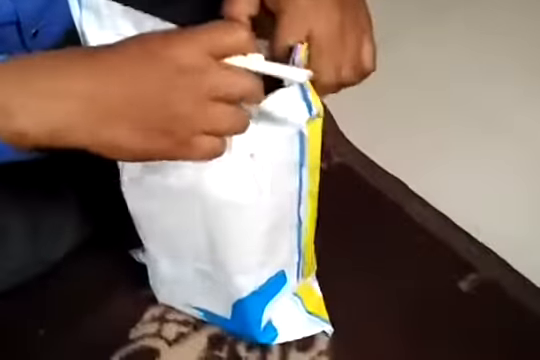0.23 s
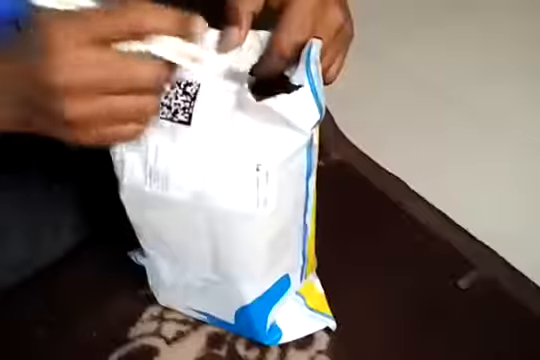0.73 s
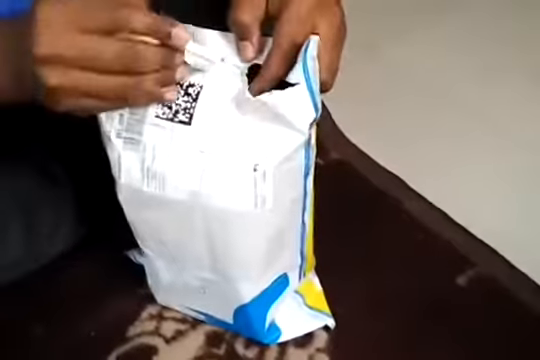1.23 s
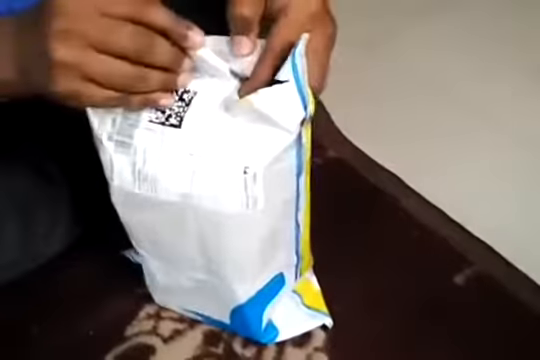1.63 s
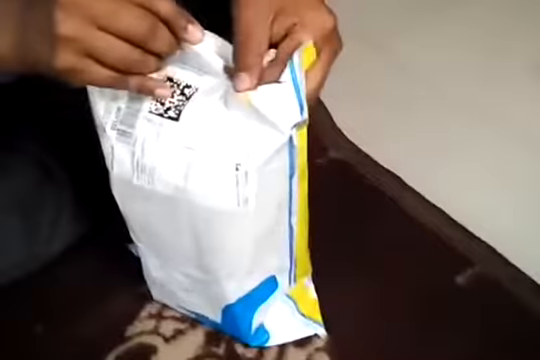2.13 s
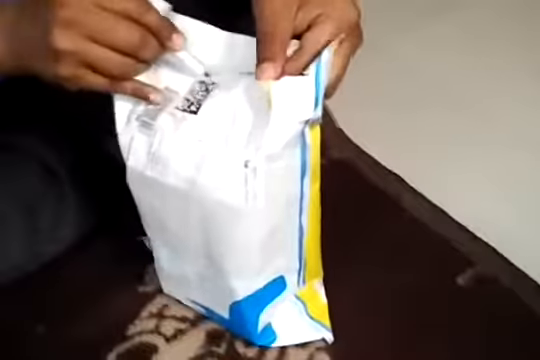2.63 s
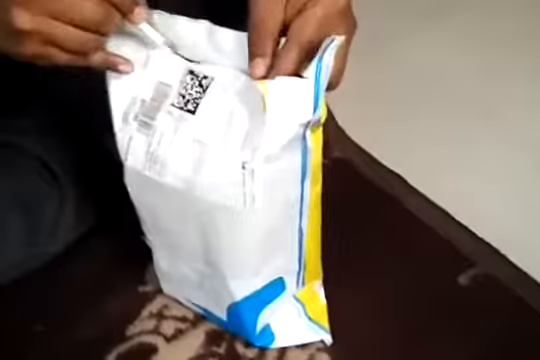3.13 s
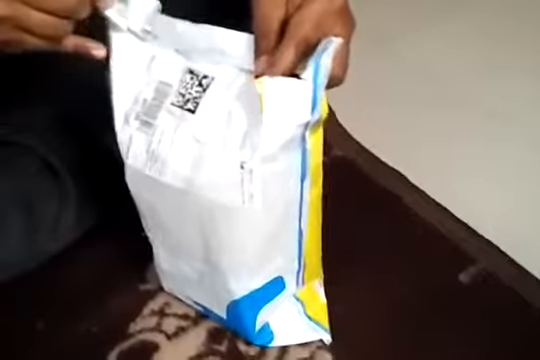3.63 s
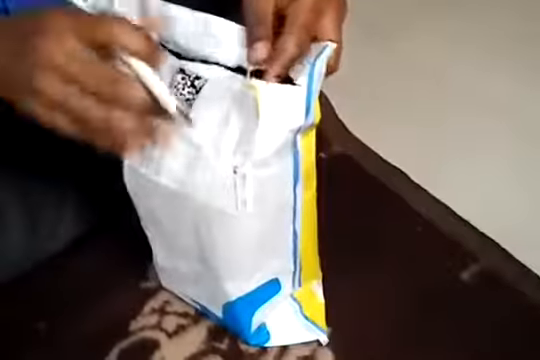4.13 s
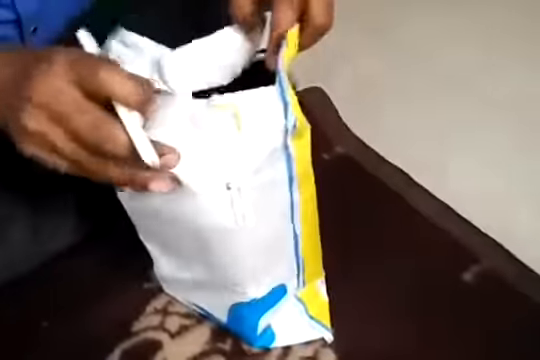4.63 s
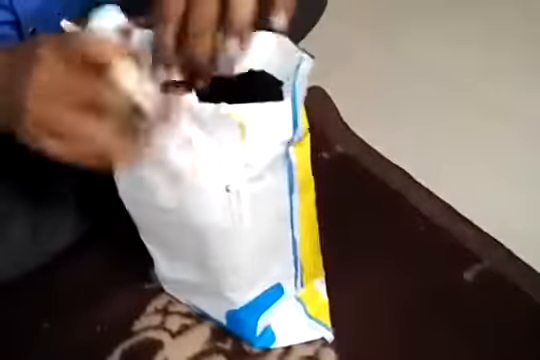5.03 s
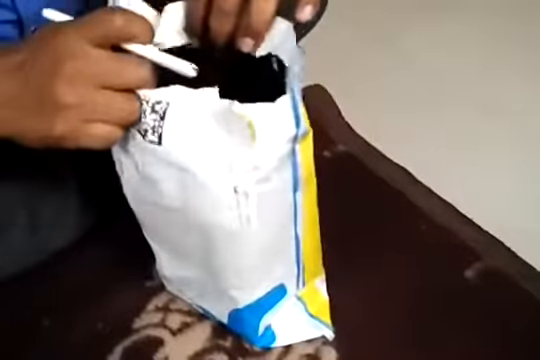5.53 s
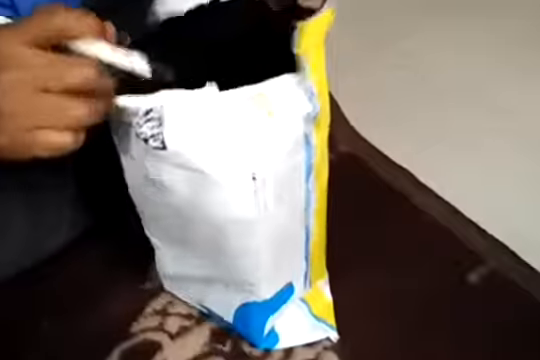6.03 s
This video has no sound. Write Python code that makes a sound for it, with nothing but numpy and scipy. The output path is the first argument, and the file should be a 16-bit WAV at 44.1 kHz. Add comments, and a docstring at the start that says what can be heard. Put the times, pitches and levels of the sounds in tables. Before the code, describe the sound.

Close handling of a stiff plastic mailer bag in a small bare room, picked up by a phone. Busy crinkling opens it, then thins to scattered ticks after a second. One very loud, bright snap cracks at about two and a half seconds, followed by a quieter stretch, then crowded tearing snaps and pops until the end. Faint room hush and low bumps lie beneath.

```python
"""Two hands tear open and crumple a stiff plastic mailer bag in a small bare room, close to a phone.
From the start a faint hush and low rumble lie under crackling film, made of random tiny cracks coloured by the bag.
Creases snap in short bursts of cracks, panels pop as short fading tones, and walls add a tail of fading noise.
The sounds thin out after the first second, the loudest snap comes at about 2.5 s, then a quieter stretch.
From about 3.7 s the snaps and pops crowd together until just after 6 s."""
import sys
import numpy as np
from scipy import signal
from scipy.fft import rfft, irfft
from scipy.io import wavfile
from scipy.ndimage import uniform_filter1d

SR = 44100
rng = np.random.default_rng(int(sys.argv[2]) if len(sys.argv) > 2 else 0)


def master(y):
    """Save y as 16-bit WAV."""
    cut = np.clip(np.atleast_2d(y).T, -1, 1)
    pcm = np.round(cut * 32767)  # scale
    wavfile.write(sys.argv[1], SR, pcm.astype(np.int16))


def level_to_linear(level):
    """Convert decibel levels to linear amplitude factors, elementwise."""
    exponent = np.asarray(level, float) / 20
    return 10 ** exponent


N = 276507
GRID_HZ = np.linspace(0, SR / 2, 2049)  # pitches at which filters are drawn
STEP = 32  # samples between readings of a gesture
# All source levels are those ahead of the phone's rounding and gain.

# Room hush, shape only: pitch_hz, level_db (per Hz)
HUSH_COLOUR = [(26, -45), (45, -21), (165, -9.5), (205, -10), (294, -2), (525, -5.5), (870, -23),
               (1000, -8), (6110, -18.5), (14200, -18.5)]
HUSH_DB, RUMBLE_DB = -65, -84  # rms of the hush, and of the rumble between bumps
# Low bumps under the handling: start_s (fullest moment), level_db (added rumble)
LOW_BUMPS = [(.16, -64), (1.35, -82), (2.58, -68.5), (3.79, -63.5), (4.4, -81), (4.64, -68.5), (5.34, -75),
             (5.75, -73.5), (6.06, -70)]
BUMP_SWELL_DB_PER_S, BUMP_FADE_DB_PER_S = 116, 69

# Broad colour of the film at the phone, shape only: pitch_hz, level_db
FILM_COLOUR = [(59, -68), (100, -25), (300, -5), (340, -3.5), (548, -17), (1060, 7.5), (1200, 1),
               (1390, 2.5), (1750, -7), (2020, -8), (4180, -1.5), (6070, -2.5), (14200, -8)]
# Resonances of the bag and the phone's port, before a spot shifts them: pitch_hz, width_hz, boost_db
BAG_RESONANCES = [(380, 89, -2), (422, 43, 9.5), (634, 84, 5.5), (900, 190, 0), (1288, 14.3, -11.5),
                  (2037, 250, 6.5), (2553, 1900, 21.5), (6200, 250, 4.5), (8320, 5100, 8.5)]
# Borders between the voices thud, wide panels, small panels, crack: pitch_hz
VOICE_BORDERS_HZ = [700, 1700, 4000]
# Places on the bag that crack: stretch (factor on resonance pitch), left_lag_ms
BAG_SPOTS = [(.97, -.14), (1.0, .07), (1.03, -.11), (.99, -.16)]
# How the left port differs from the right: pitch_hz, left_over_right_db
LEFT_OVER_RIGHT = [(60, .5), (200, 2), (400, 1), (1300, 2.5), (2400, 3.5), (4200, 4), (5500, 9.5),
                   (8000, 10), (12000, 8), (15000, 6)]

# Crumplings of the film: start_s (full strength), held_s, level_db (before voice levels), tilt_db (crack to thud)
CRUMPLINGS = [(0.0, 0.081, -45.5, 0.5), (.15, 0.06, -45, 2), (0.278, 0.079, -39, 0.5),
              (.42, 0.097, -52.5, -5), (.52, 0.019, -51, 24), (0.678, 0.0074, -41.5, -3),
              (1.029, 0.023, -47.5, 2), (1.111, 0.013, -51.5, -4), (1.588, 0.011, -47, -3),
              (1.66, 0.06, -59, 6), (1.825, 0.06, -55.5, 7), (1.908, 0.06, -52, -7.5),
              (2.149, 0.0084, -50, 1), (2.238, 0.0067, -48, 6), (2.38, .01, -91, 20),
              (2.483, 0.0023, -73, -18), (2.548, 0.05, -28, 7), (2.95, 0.034, -59.5, 9),
              (3.038, 0.092, -47.5, -7), (3.139, 0.068, -43, -4.5), (3.469, 0.01, -51.5, 13),
              (3.673, 0.0036, -33, 11), (3.72, 0.013, -43, 7), (3.874, 0.084, -53.5, -5.5),
              (4.1, 0.12, -77, -25), (4.328, 0.0062, -51, 15), (4.39, 0.069, -55, 0),
              (4.46, 0.0076, -40, 0), (4.55, 0.01, -40.5, -6), (4.615, 0.013, -37, -3),
              (4.678, 0.01, -36.5, 1), (4.82, 0.09, -60, 2), (5.073, 0.005, -40, 10),
              (5.16, 0.093, -54.5, 14), (5.312, .03, -40.5, -1), (5.39, 0.081, -45, 8),
              (5.474, 0.014, -38, 1.5), (5.53, .06, -45, 2), (5.623, 0.0033, -34.5, 1),
              (5.66, 0.031, -40.5, 6), (5.79, 0.18, -50.5, 3), (5.938, 0.0027, -39, -12),
              (5.97, 0.039, -37, 5), (6.018, 0.0035, -33.5, 1), (6.06, 0.048, -46, 36),
              (6.15, .04, -51.5, 2)]
SWELL_DB_PER_S, SETTLE_DB_PER_S = 2195, 180
# Crumpling level of thud, wide panels, small panels, crack: level_db
VOICE_LEVEL_DB = [-14, -5.5, -2.5, -6]
# Share of the tilt taken by each of the four voices: share (no unit)
TILT_SHARE = [0.23, -0.26, -0.29, -0.87]
# Faint crackle of the resting film in each of the four voices: level_db
RESTING_LEVEL_DB = [-74, -84, -81.5, -82.5]

# Bands of the walls' answer: pitch_hz, t60_s (time to fall 60 dB), level_db (before the band filter)
WALL_TAIL = [(151, 0.82, -3.5), (360, 0.16, -2.5), (920, 0.5, -6.5), (2720, 0.35, -1), (5900, 0.39, -1.5),
             (10700, 0.3, -8), (14000, 0.26, -3)]
TAIL_START_MS, TAIL_ALIKE_HZ = 4, 1100  # silent until the start; both ports nearly alike well below this pitch

# Panels that pop with a clear pitch: start_s, level_db (before rise and fade), pitch_hz
CLEAR_POPS = [(0.1231, -36, 338), (0.143, -33, 372), (0.1568, -32, 320), (0.6662, -21.5, 960),
              (1.822, -21, 2710), (2.4760, -25, 6200), (2.5440, -7, 6200), (2.543, -21, 1113),
              (2.5520, -37.5, 345), (3.3440, -42, 864), (3.4520, -29, 2050), (3.6660, -24, 400),
              (3.6780, -27.5, 408), (3.7460, -31, 1030), (4.0810, -30, 6000), (4.5700, -20.5, 1980),
              (4.6220, -33, 393), (4.677, -15, 3150), (5.5400, -21.5, 2050), (6.0160, -25.5, 400)]
POP_T60_MS, POP_RISE_MS = 14.9, 0.98  # the ring time is for 1 kHz
SMALL_POPS_PER_S, SMALL_POP_TOP_DB = 160, 6  # top level is over the crumpling at that moment
SMALL_POP_HZ = (303.5, 6750)

# Loud snaps, before the voices: start_s, crack_peak_db, ring_db (over the crack, for a perfect size match),
# size (0 small panel to 1 whole bag), length_ms
CREASE_SNAPS = [(0.0647, -20, -15, 0.52, 4), (0.1232, -30.5, 3, 0.61, 34), (0.1413, -25.5, -0.5, .5, 12),
                (0.183, -15, -7, 0.055, 4.8), (0.2575, -26, 7.5, 0.63, 7.6), (0.27, -19, -17, .5, 4),
                (0.2882, -18, -19, 1, 2), (0.3464, -27, -17, 0.14, 15), (0.4844, -34, -1.5, 0.55, 14),
                (0.5246, -44.5, 17.5, 0.37, 4.7), (0.6659, -20, 6.5, 0.71, 5.9),
                (0.693, -18, -13, 0.33, 5.6), (1.0006, -46.5, 12.5, 0.81, 19), (1.0202, -46, 17, 0.26, 9.2),
                (1.0424, -50.5, 20.5, .5, 13), (1.105, -23, -1, .5, 3.6), (1.285, -52, 8.5, 0.56, 7.8),
                (1.5266, -39.5, -7, 0.51, 21), (1.5800, -30, 1.5, 0.4, 6.8), (1.5898, -26, -14, .5, 4.5),
                (1.651, -34, 1.5, 0.49, 12), (1.731, -37, -1.5, .02, 8.9), (1.7890, -32.5, -12, 0.12, 14),
                (1.8194, -26.5, 3, 0.042, 5.4), (1.8794, -36, 2.5, .5, 4.3), (1.9027, -18, -4.5, 0.7, 4.7),
                (2.043, -42.5, 8, .5, 15), (2.1307, -49.5, 23.5, 0.17, 4.4), (2.1386, -32.5, -4.5, 1, 7.5),
                (2.2, -40.5, -1, 0.51, 12), (2.2302, -32, -1, .5, 9), (2.3704, -63.5, 22, 1, 2),
                (2.4054, -53, -20, .5, 6.9), (2.4713, -28, -26, 0.5, 2.4), (2.4762, -24.5, -11, .5, 6.2),
                (2.5300, -24, -5, .52, 19), (2.541, -6.5, -1.5, 0.49, 9.6), (2.5430, -12.5, -1, .5, 28),
                (2.5778, -23, 1, .02, 12), (2.593, -14, -21, .02, 14), (2.6167, -28.5, 10, 0.59, 3.2),
                (2.8707, -40, 3.5, .5, 4.7), (2.9308, -35, -5.5, 0.69, 8.9), (3.02, -27.5, -2, 0.56, 8.3),
                (3.2357, -27.5, -4, 0.14, 2.5), (3.3414, -57, 4, 0.29, 5.8), (3.4504, -37.5, 12, 0.16, 4.6),
                (3.4565, -25.5, -5, 0.49, 5), (3.4659, -43, 0, 0.46, 1.4), (3.6659, -16, 7, 0.71, 20),
                (3.6737, -15.5, 0, 0.076, 7.2), (3.717, -26.5, -2, .47, 6.1),
                (3.755, -39.5, 22.5, .28, 4.7), (3.839, -43, 18.5, 0.19, 24),
                (3.865, -31.5, 5.5, 0.72, 5.5), (3.883, -33, -18, .28, 8.1), (3.92, -35, -24, 0.47, 12),
                (3.9431, -34, 4.5, 0.36, 9.6), (4.0344, -43, 1.5, .5, 7.6), (4.0573, -43.5, 8, .5, 5.5),
                (4.08, -26.5, -17, .5, 6.7), (4.195, -46, -6, 0.57, 9.6), (4.2045, -40, -3, 0.87, 17),
                (4.288, -37.5, -10, 0.47, 8.2), (4.3224, -44.5, 15.5, .5, 9.3),
                (4.3737, -31, -4, 0.27, 2.4), (4.41, -36.5, 7, 0.24, 4.1), (4.43, -30, 5.5, .02, 6.9),
                (4.4485, -22, 8.5, 0.15, 5.1), (4.4553, -32, 12, 0.71, 1.9),
                (4.4651, -25.5, 10.5, 0.67, 10), (4.5534, -28.5, 13.5, .2, 18),
                (4.5684, -29.5, -3, .5, 6.7), (4.6079, -15, 0.5, 0.71, 9), (4.6214, -29, -7, 0.37, 5),
                (4.6777, -15, 7.5, 0.18, 4.5), (4.6975, -25.5, -8, 1, 7.8), (4.8904, -44, -11, .5, 9.9),
                (4.9192, -42.5, 5, 0.017, 9.3), (4.9551, -44.5, -1, 1, 2.3), (5.0496, -38, 9, 0.66, 19),
                (5.07, -23.5, -2, 0.048, 4), (5.1487, -37.5, 5, 0.85, 2.1), (5.1856, -38, -2, .5, 12),
                (5.2922, -22.5, -16, 0.17, 11), (5.3238, -22, 4, 0.29, 12.4), (5.3493, -36, 8.5, 0.41, 9.2),
                (5.4196, -33, 5, .5, 4.1), (5.463, -23.5, 8.5, 0.61, 4.1), (5.4824, -22.5, -26, 0.12, 7.7),
                (5.54, -36, 23.5, 0.23, 4.3), (5.5886, -43.5, 19, .5, 7.2), (5.6134, -17.5, 2, 0.24, 6.3),
                (5.6205, -14.5, -4.5, .02, 7.9), (5.668, -22, -9, .5, 11), (5.785, -26, -6, 0.66, 5.9),
                (5.847, -33, 4, 0.95, 4.2), (5.886, -33, 4, 0.32, 8.4), (5.901, -23.5, 5, 0.13, 14),
                (5.9269, -17, -0.5, 0.71, 9.2), (5.9437, -10, -18, .5, 2.7), (5.956, -43, -7, .75, 2.2),
                (5.9953, -18, -5.5, 0.99, 18), (6.0145, -16, 8, 0.27, 3.9)]
# Size that suits thud, wide panels and small panels best: size (0 to 1)
BEST_SIZE = [1, .5, 0]
SIZE_FALL_DB = 30.5  # drop per unit of size away from the best one
SNAP_RISE_MS, SNAP_FADE_MS, SNAP_STOP_MS = 1.1, 8, 1.83  # the last two are time constants

# Steep cut of the finished mix above about 14.3 kHz: pitch_hz, level_db
TREBLE_CUT = [(14250, 5), (14550, -38), (16500, -45)]


def unit(x):
    """Scale to an rms of 1."""
    return x / np.sqrt(np.mean(x ** 2))


def on_log_hz(table, hz):
    """Read a table of pitch and value, evenly by musical distance between its rows."""
    pitch_hz, value = np.transpose(table)
    return np.interp(np.log(hz + 1), np.log(pitch_hz), value)


def causal(db):
    """Turn levels from 0 Hz to SR / 2 into a filter that answers as early as it can (minimum phase)."""
    cepstrum = irfft(db * np.log(10) / 20)
    half = len(cepstrum) // 2
    cepstrum[1:half] *= 2
    cepstrum[half + 1:] = 0
    return irfft(np.exp(rfft(cepstrum)))[:half]


def through(x, response):
    """Send a sound through a filter and keep the scene's length."""
    return signal.fftconvolve(x, response)[:N]


def filtered(x, order, hz, kind):
    """Keep one part of the pitch range with a smooth-sided filter."""
    return signal.sosfilt(signal.butter(order, hz, kind, fs=SR, output="sos"), x)


def gestures(s, held, swell_db, settle_db):
    """Gain of each gesture: it swells, holds at 1, then settles, at steady rates in dB per second."""
    late_s = np.arange(0, N, STEP) / SR - np.asarray(s)[:, None]
    swell = np.minimum(swell_db * late_s, 0)
    settle = settle_db * np.maximum(late_s - np.asarray(held)[:, None], 0)
    return level_to_linear(swell - settle)


def hush():
    """Faint steady room noise, shaped from random noise, with a low rumble that swells in bumps."""
    colour = causal(on_log_hz(HUSH_COLOUR, GRID_HZ))
    mid, side = (through(rng.standard_normal(N), colour) for _ in range(2))
    side = filtered(side, 1, 600, "high")  # the bass stays alike at both ports
    steady = level_to_linear(HUSH_DB) * unit(np.array([mid + side, mid - side]))
    shared_noise = rng.standard_normal(N)
    own_noise = 0.42 * rng.standard_normal((2, N))
    rumble = filtered(shared_noise + own_noise, 2, [48, 110], "band")
    s, db = np.transpose(LOW_BUMPS)
    bumps = level_to_linear(db) @ gestures(s, 0 * s, BUMP_SWELL_DB_PER_S, BUMP_FADE_DB_PER_S)
    bumps = np.repeat(bumps, STEP)[:N]
    return steady + unit(rumble) * (level_to_linear(RUMBLE_DB) + bumps)


def voices(stretch):
    """Four bag responses of equal energy: hollow thud, wide panels, small panels, bright crack."""
    db = on_log_hz(FILM_COLOUR, GRID_HZ)
    for hz, width_hz, boost_db in BAG_RESONANCES:
        db = db + boost_db / (1 + (2 * (GRID_HZ - stretch * hz) / width_hz) ** 2)
    below = [1 / (1 + (GRID_HZ / hz) ** 8) for hz in VOICE_BORDERS_HZ]
    below = [0 * GRID_HZ] + below + [1 + 0 * GRID_HZ]
    shares = np.diff(below, axis=0)  # each voice gets the power between two borders
    responses = [causal(db + 10 * np.log10(share + 1e-7)) for share in shares]
    return [r / np.sqrt(np.sum(r ** 2)) for r in responses]


def crumpling():
    """Strength of the crackle in each voice: the crumplings add in power over the resting film."""
    s, held, db, tilt_db = np.transpose(CRUMPLINGS)
    voice_db = db + np.outer(TILT_SHARE, tilt_db) + np.c_[VOICE_LEVEL_DB]
    power = level_to_linear(2 * voice_db) @ gestures(s, held, SWELL_DB_PER_S, SETTLE_DB_PER_S) ** 2
    resting_power = level_to_linear(2 * np.c_[RESTING_LEVEL_DB])
    return np.repeat(np.sqrt(power + resting_power), STEP, axis=1)[:, :N]


def cracks(per_s, spread_db):
    """Tiny random cracks of either sign, most faint and a few strong."""
    happens = rng.random(N) < per_s / SR
    strength = level_to_linear(spread_db * rng.exponential(size=N))
    return unit(happens * rng.standard_normal(N) * strength)


def crackle(strength):
    """Dense crumpling at one spot: a hail of cracks; each voice flutters as small creases come and go."""
    hold = int(SR * .006)  # a new flutter level every 6 ms
    steps = rng.standard_normal((5, N // hold + 1))
    flutter_db = 2.2 * steps[0] + 3.2 * steps[1:]  # partly shared, partly each voice's own
    flutter_db = np.repeat(flutter_db, hold, axis=1)[:, :N]
    flutter = level_to_linear(uniform_filter1d(flutter_db, hold // 2))
    hail = cracks(per_s=3600, spread_db=1.5)
    return strength * unit(flutter * hail) / np.sqrt(len(BAG_SPOTS))


def room_tail():
    """Wall echoes as fading noise, each band at its own pace; ports nearly alike in bass, apart in treble."""
    length = SR // 2
    t, hz = np.arange(length) / SR, np.fft.rfftfreq(length, 1 / SR)
    mid, side = rfft(rng.standard_normal((2, length)))
    apart = (hz ** 4 + .08 * TAIL_ALIKE_HZ ** 4) / (hz ** 4 + TAIL_ALIKE_HZ ** 4)
    side = np.sqrt(apart) * side
    ports = np.array([mid + side, mid - side]) / np.sqrt(1 + apart)
    tail = 0
    for band, (_, t60_s, db) in enumerate(WALL_TAIL):
        # 1 at this band's pitch, sloping to 0 at its neighbours
        share = on_log_hz([(row[0], k == band) for k, row in enumerate(WALL_TAIL)], hz)
        fade = level_to_linear(-60 * t / t60_s)
        tail = tail + level_to_linear(db) * irfft(share * ports, length) * fade / np.sqrt(np.sum(fade ** 2))
    return tail * np.clip(t * 1000 / TAIL_START_MS - 1, 0, 1)  # first reflections need time to arrive


def pops(strength):
    """Panels ring as short fading tones: the clear ones, and small chance ones that follow the crumpling."""
    when, pitch, scatter = rng.random((int(SMALL_POPS_PER_S * N / SR), 3)).T
    low, high = SMALL_POP_HZ
    around = np.sqrt(np.sum(strength ** 2, axis=0))[(when * N).astype(int)]
    small_gain = around * level_to_linear(SMALL_POP_TOP_DB - 11 * scatter)
    small = zip(when * N / SR, small_gain, low * (high / low) ** pitch)
    clear = [(s, level_to_linear(db), hz) for s, db, hz in CLEAR_POPS]
    out, t = np.zeros((len(BAG_SPOTS), N + SR)), np.arange(2048) / SR
    for k, (s, gain, hz) in enumerate(clear + list(small)):
        t60_ms = POP_T60_MS * (1000 / hz) ** .3  # smaller panels stop sooner
        shape = np.minimum(t * 1000 / POP_RISE_MS, 1) * level_to_linear(-60 * t * 1000 / t60_ms)
        start = int(s * SR)
        out[k % len(BAG_SPOTS), start:start + len(t)] += gain * shape * np.sin(2 * np.pi * hz * t)
    return filtered(out[:, :N], 2, 170, "high")  # a small panel moves no bass


def snaps():
    """Each crease gives way at one spot in a burst of cracks that swells fast, fades, then stops in a few ms."""
    drive = np.zeros((len(BAG_SPOTS), 4, N + SR))
    t_ms = np.arange(2048) / SR * 1000
    hail = np.append(cracks(per_s=20000, spread_db=.5), np.ones(SR))
    for k, (s, crack_db, ring_db, size, length_ms) in enumerate(CREASE_SNAPS):
        start = int(s * SR)
        swell = np.minimum(t_ms / SNAP_RISE_MS, 1)
        stop = 1 + np.exp(np.minimum((t_ms - length_ms) / SNAP_STOP_MS, 50))
        shape = swell * np.exp(-t_ms / SNAP_FADE_MS) / stop
        burst = shape * hail[start:start + len(t_ms)]
        lower_db = ring_db - SIZE_FALL_DB * np.abs(size - np.array(BEST_SIZE))
        gains = level_to_linear(crack_db + np.append(lower_db, 0)) / np.abs(burst).max()
        drive[k % len(BAG_SPOTS), :, start:start + len(t_ms)] += gains[:, None] * burst
    return drive[..., :N]


def scene():
    """Each spot reaches the two ports with its own time shift and tone, directly and by its own wall paths."""
    half_lean_db = on_log_hz(LEFT_OVER_RIGHT, GRID_HZ) / 2
    out, strength = hush(), crumpling()
    for (stretch, lag_ms), bursts, rings in zip(BAG_SPOTS, snaps(), pops(strength)):
        drives = bursts + crackle(strength)
        bag = rings + sum(through(drive, r) for drive, r in zip(drives, voices(stretch)))
        left = through(bag, causal(half_lean_db))
        right = through(bag, causal(-half_lean_db))
        left = np.roll(left, int(round(lag_ms * SR / 1000)))
        out = out + [port + through(port, tail) for port, tail in zip((left, right), room_tail())]
    return out


def low_pass(x):
    """Removes everything above the highest recorded frequency."""
    return signal.sosfilt(signal.butter(12, 16830, fs=SR, output="sos"), x)


def record(dry):
    """The phone rounds the loudest peaks, then the treble above about 14.3 kHz is cut steeply."""
    treble_cut = causal(np.interp(GRID_HZ, *np.transpose(TREBLE_CUT)))
    rounded = np.tanh(0.84 * dry) / 1.45
    mix = np.array([through(port, treble_cut) for port in rounded])
    return low_pass(mix)


dry = scene()
out = record(dry)
master(out)
```